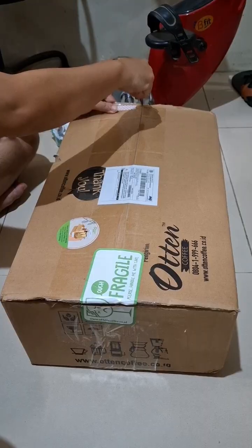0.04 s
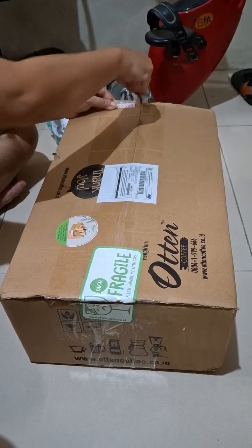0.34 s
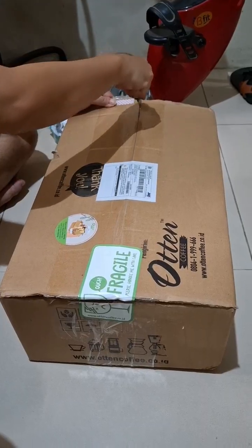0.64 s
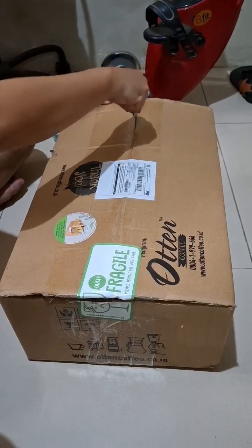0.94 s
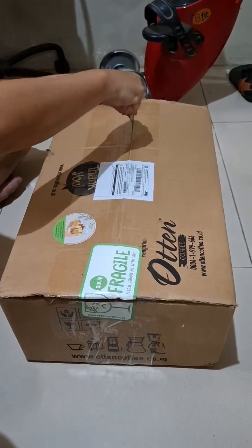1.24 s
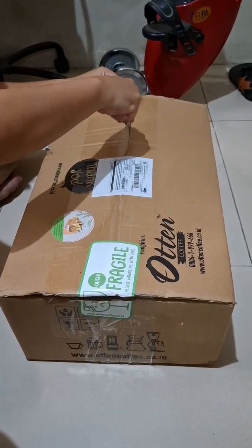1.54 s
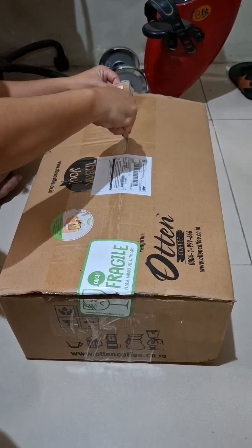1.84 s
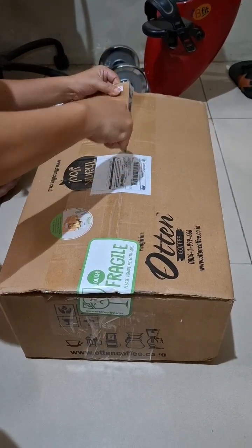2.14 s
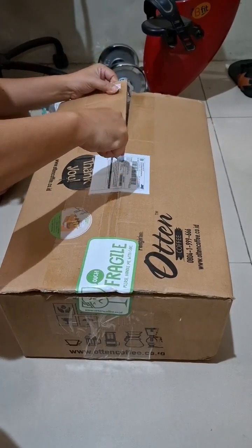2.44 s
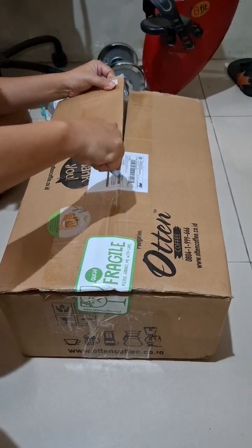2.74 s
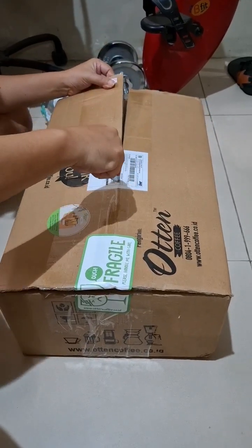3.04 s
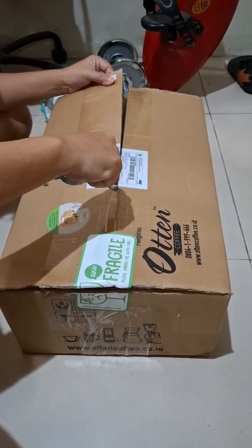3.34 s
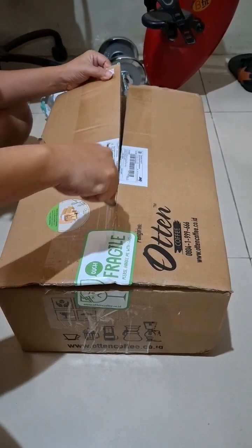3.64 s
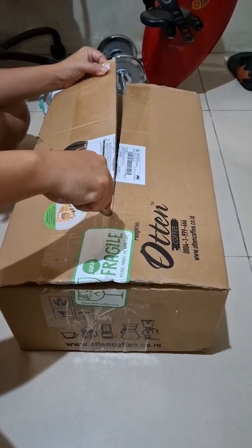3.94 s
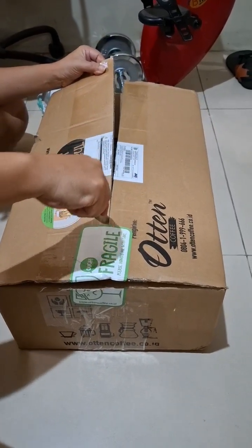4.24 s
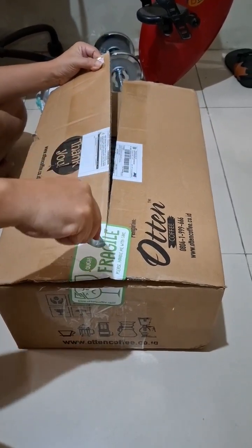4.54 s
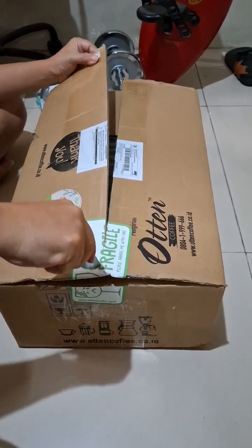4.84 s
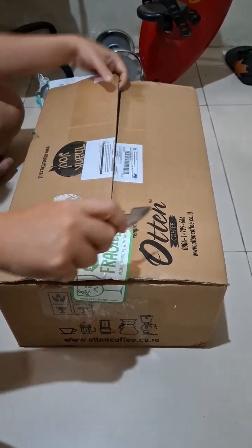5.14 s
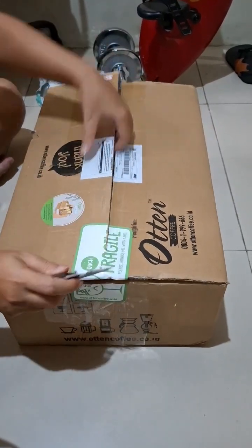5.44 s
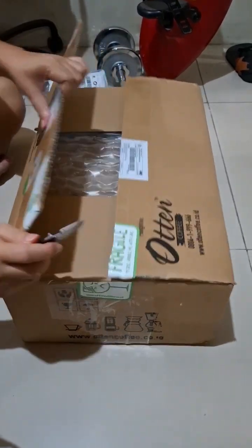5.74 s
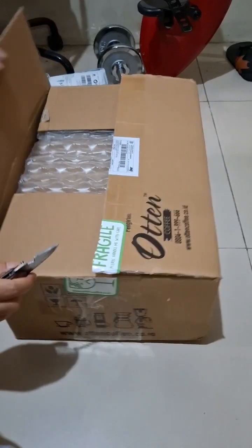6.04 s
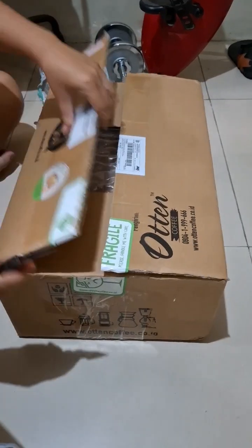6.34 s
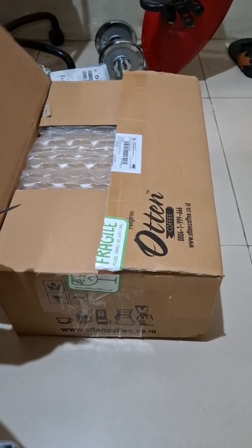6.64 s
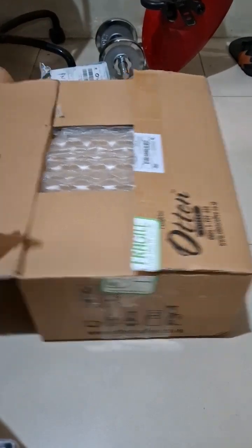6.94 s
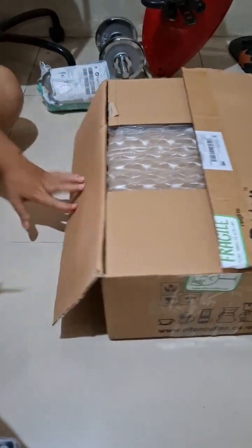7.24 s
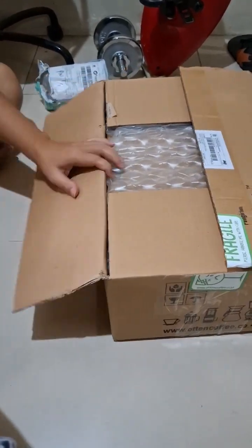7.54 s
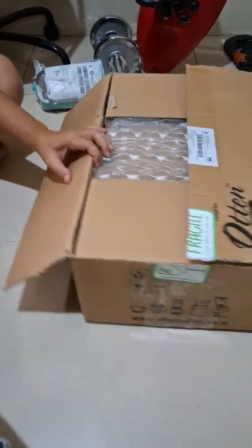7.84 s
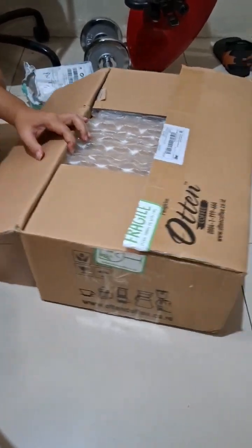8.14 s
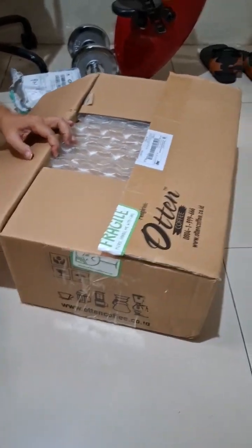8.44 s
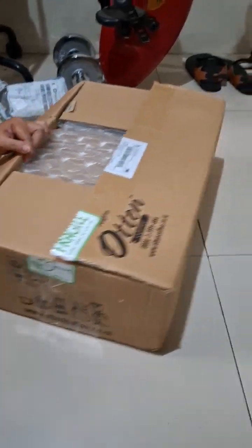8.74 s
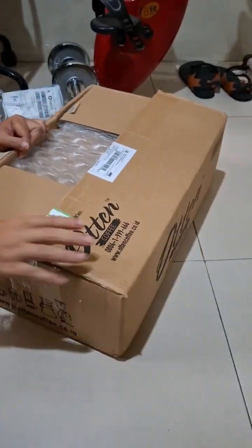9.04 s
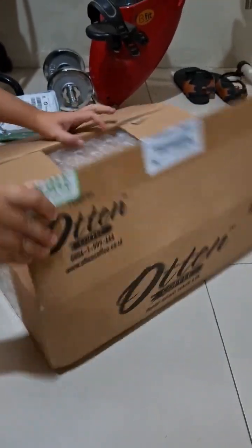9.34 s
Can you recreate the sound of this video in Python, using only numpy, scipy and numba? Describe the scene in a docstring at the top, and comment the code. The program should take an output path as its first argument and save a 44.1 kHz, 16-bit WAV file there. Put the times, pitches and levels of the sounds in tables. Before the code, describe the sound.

In a small tiled room, scissors cut a taped cardboard box with snaps and thuds, before flaps rustle and the box scuffs round.

```python
"""Tape crackles and snaps and a cardboard box booms as scissors stab its seam and drag along it.
The blade catches and slips, shaking the panels; blows ring the box; the cardboard creaks and scuffs.
From about 5 s a flap is torn open and folded back, then the box slides round on the floor, rasping
and hissing, with snaps from its plastic packing. A small tiled room adds a short bright tail.
An engine drones faintly outdoors throughout."""
import sys
import numpy as np
from scipy import signal
from scipy.fft import rfft, irfft
from scipy.io import wavfile
from scipy.ndimage import uniform_filter1d, map_coordinates
from numba import njit

SR = 44100
rng = np.random.default_rng(int(sys.argv[2]) if len(sys.argv) > 2 else 0)


def persist_wave(psi):
    """Save psi, clipped to +-1, as 16-bit WAV."""
    counts = np.round(np.clip(psi, -1, 1) * 32767).astype(np.int16)
    wavfile.write(sys.argv[1], SR, np.atleast_2d(counts).T)


N = 418068
TIME_S = np.arange(N) / SR
EVENT_S = TIME_S[:SR // 2]


def undb(db):
    """Decibels to gain."""
    return 10 ** (np.asarray(db) / 20)


def unit_rms(x):
    """Scale to rms 1."""
    return x / np.sqrt(np.mean(x ** 2))


def unit_peak(x, size=256):
    """Scale the loudest few milliseconds to rms 1."""
    return x / np.sqrt(uniform_filter1d(x ** 2, size).max())


def add(out, start_s, x):
    """Mix x in at start_s."""
    i = max(int(start_s * SR), 0)
    out[i:i + len(x)] += x[:max(N - i, 0)]


def on_log(hz, points):
    """Interpolate (freq_hz, value) points on a log-frequency axis."""
    freq_hz, values = np.transpose(points)
    return np.interp(np.log(hz + 1), np.log(freq_hz), values)


def colour(x, spectrum, size=4096):
    """Minimum-phase filter from (freq_hz, level_db) points."""
    hz = np.arange(size // 2 + 1) * SR / size
    cepstrum = irfft(np.log(undb(on_log(hz, spectrum))))
    cepstrum[1:size // 2] *= 2
    cepstrum[size // 2 + 1:] = 0
    return signal.fftconvolve(x, irfft(np.exp(rfft(cepstrum))))[:len(x)]


def high_pass(x, hz, order=2):
    """Butterworth high-pass."""
    return signal.sosfilt(signal.butter(order, hz, "high", fs=SR, output="sos"), x)


@njit
def svf(x, hz, width_hz):
    """State-variable band-pass, one centre per sample."""
    y, band_state, low_state = np.empty(len(x)), 0., 0.
    for i in range(len(x)):
        g = np.tan(np.pi * min(hz[i] / SR, .45))
        damping = width_hz / hz[i]
        v = (band_state + g * (x[i] + 1e-18 - low_state)) / (1 + g * (g + damping))
        band_state = 2 * v - band_state
        low_state += 2 * g * v
        y[i] = damping * v
    return y


def band(x, hz, width_hz):
    """One resonance, fixed or gliding."""
    return svf(x, hz * np.ones(len(x)), float(width_hz))


def fade(t60_s):
    """Exponential decay."""
    return np.exp(-np.log(1000) * EVENT_S / max(t60_s, 1 / SR))


def wander(hz):
    """Random motion through normal draws, hz of them a second."""
    count = int(N / SR * hz) + 2
    return np.interp(TIME_S * hz, np.arange(count), rng.standard_normal(count))


def ring(modes, detune, scatter_db):
    """Struck modes; strength and tuning vary with where the blow lands."""
    out = 0
    for hz, db, t60_s in modes:
        envelope = undb(db + scatter_db * rng.normal()) * fade(t60_s)
        pitch_hz = hz * (1 + detune * rng.normal())
        out += envelope * np.sin(2 * np.pi * pitch_hz * EVENT_S)
    return out


def slips(rate_hz, spread_db):
    """Tiny random slips: many weak, a few strong."""
    size = undb(spread_db * np.minimum(rng.exponential(size=N), 4))
    occurs = rng.random(N) < rate_hz / SR
    return unit_rms(occurs * size * rng.choice([-1, 1], N))


def efforts(table, attack_s, release_s, sag_db):
    """Each push takes hold, sags (swells if negative) and lets go; one gain curve per dB column."""
    out = np.zeros((len(table[0]) - 2, N))
    for start_s, length_s, *levels_db in table:
        t = TIME_S[TIME_S < length_s + 8 * release_s]
        attack = np.minimum(t / attack_s, 1)
        held = undb(sag_db * (.5 - np.minimum(t / length_s, 1)))
        release = np.exp(-np.maximum(t - length_s, 0) / release_s)
        for layer, db in zip(out, levels_db):
            add(layer, start_s, undb(db) * attack * held * release)
    return out


def diffuse(count, apart_hz=750):
    """Stereo noise from all sides: alike in the bass, unrelated in the treble."""
    hz = np.arange(count // 2 + 1) * SR / count
    alike = 1 / (1 + (hz / apart_hz) ** 2)
    mid, side = rfft(rng.standard_normal((2, count)))
    mid, side = mid * np.sqrt(1 + alike), side * np.sqrt(1 - alike)
    return irfft(np.array([mid + side, mid - side]) / np.sqrt(2), count)


# corrugated board resonances: pitch_hz, width_hz, gain_db
BOARD_BANDS = [(410, 59, 0.5), (577, 87, 1.5), (870, 130, 4.5), (1021, 116, 3.5), (1105, 61, 3.5),
               (1378, 386, -3.5), (1924, 247, -3), (2935, 620, -12.5)]
def board(force):
    """Force through the board's damped resonances, each at least a tenth of its pitch wide."""
    return sum((-1) ** k * undb(db) * band(force, hz, max(width_hz, hz / 10))
               for k, (hz, width_hz, db) in enumerate(BOARD_BANDS))


# panel and tape spectra: freq_hz, level_db
PANEL_SPECTRUM = [(30, -19), (70, 4), (130, 2.5), (200, 2), (300, -6), (450, -13), (700, -26.5),
                  (1500, -39.5)]
TAPE_SPECTRUM = [(1200, -14), (2500, -19), (4000, -2.5), (6500, -5), (9000, -1.5), (12000, 1),
                 (16000, -12.5)]
# blade pulls, and light creep between them: start_s, length_s, force_db, crackle_db
BLADE_PULLS = [(0.176, .11, -45, -56), (0.48, 0.096, -40, -45), (0.78, .2, -57.5, -60),
               (1.005, 0.057, -51.5, -59), (1.23, 0.096, -50.5, -60), (1.54, 0.11, -57.5, -59),
               (1.66, 0.1, -56.5, -64.5), (1.88, 0.065, -61, -56.5), (2.0, 0.12, -62, -63.5),
               (2.14, 0.056, -53.5, -53), (2.28, .13, -56, -62), (2.48, 0.2, -59, -64.5),
               (2.68, 0.094, -49, -57), (2.92, .06, -59.5, -73), (3.12, .29, -61.5, -66),
               (3.5, .26, -51.5, -60), (3.87, 0.09, -63.5, -74), (4.212, .04, -54.5, -57),
               (4.28, 0.13, -58, -62), (4.398, .045, -43, -58), (4.535, 0.081, -54, -64.5),
               (4.638, 0.08, -44.5, -53.5)]
BLADE_CREEPS = [(0, 0.38, -66, -91), (0.6, 2.22, -63, -70), (2.8, 0.67, -75.5, -87),
                (4.165, 0.834, -64.5, -68.5)]
# lid, stiff at the rims and soft in the middle: time_s, rumble_gain_db
LID_FLEX = [(0, 0), (1.2, 4.5), (2.2, 13.5), (3.6, 12.5), (4.7, 10)]
def cutting():
    """The blade catches and slips; each slip shakes the panels and parts a tuft of fibres and tape."""
    pulls = efforts(BLADE_PULLS, attack_s=0.0076, release_s=0.0064, sag_db=2)
    creep = efforts(BLADE_CREEPS, attack_s=0.0077, release_s=0.01, sag_db=15)
    jerks = undb(2 * wander(hz=30))
    force, tape_gain = np.hypot(pulls, creep) * jerks
    flex = undb(np.interp(TIME_S, *np.transpose(LID_FLEX)))
    catches = slips(rate_hz=170, spread_db=3.5)
    tuft_envelope = signal.fftconvolve(np.abs(catches), fade(t60_s=0.014))[:N]
    tufts = unit_rms(tuft_envelope * rng.standard_normal(N))
    fibres = tufts + undb(-4) * slips(rate_hz=5000, spread_db=0.93)
    shaking = catches + slips(rate_hz=900, spread_db=0.96)
    rumble = force * flex * unit_rms(colour(shaking, PANEL_SPECTRUM))
    rasp = force * unit_rms(board(fibres))
    crackle = tape_gain * unit_rms(colour(fibres, TAPE_SPECTRUM))
    return undb(-3) * (rumble + rasp) + crackle


# engine outdoors: time_s, firing_hz, level_db
ENGINE_TRACK = [(0, 114.8, -54.5), (0.902, 128.3, -55), (2, 130.1, -51), (2.5, 147.9, -50),
                (3.102, 130.7, -49.5), (3.8, 106, -52.5), (4.3, 121.7, -54), (7.1, 128.4, -60.5),
                (7.7, 120, -68.5), (8.3, 126.6, -56), (9.48, 110.4, -57)]
def engine(gain_db=-2, waver=0.0278, flutter_db=3.8, overtone_db=-14):
    """Only the two lowest harmonics of the uneven firing pass the walls."""
    time_s, firing_hz, level_db = np.transpose(ENGINE_TRACK)
    pitch_hz = np.interp(TIME_S, time_s, firing_hz) * (1 + waver * wander(hz=25))
    phase = 2 * np.pi * np.cumsum(pitch_hz) / SR
    gain = undb(np.interp(TIME_S, time_s, level_db) + gain_db + flutter_db * wander(hz=24))
    return gain * unit_rms(np.sin(phase) + undb(overtone_db) * np.sin(2 * phase))


# background spectrum: freq_hz, level_db
AMBIENCE_SPECTRUM = [(15, -61), (25, -13), (127, -1.5), (195, -16), (463, -18.5), (531, -26.5),
                     (1400, -30.5), (1700, -34), (1890, -36), (3520, -46.5), (9570, -42.5), (16000, -50)]
def ambience(level_db=-57):
    """Steady low noise from outdoors, arriving from all sides."""
    channels = [colour(noise, AMBIENCE_SPECTRUM) for noise in diffuse(N)]
    return undb(level_db) * unit_rms(np.array(channels))


def clap(t60_s, flutter, low_cut_hz):
    """An impulse on the board, then a short flutter of its liners."""
    force = flutter * rng.standard_normal(len(EVENT_S)) * fade(t60_s)
    force[0] += 1
    return unit_peak(high_pass(board(force), low_cut_hz))


# tape, plastic and board snapping: start_s, crack_db, pitch_hz, clap_db
FILM_SNAPS = [(0.1042, -51, 8900, -41), (0.163, -54, 6900, -44.5), (0.2494, -36, 4530, -45),
              (0.4782, -26.5, 3570, -39), (0.597, -36.5, 11500, -38.5), (1.013, -43, 11500, -54),
              (1.5671, -34, 11500, -42), (1.6107, -45, 11400, -55), (2.0164, -38.5, 11400, -42.5),
              (2.113, -36, 10100, -55), (2.2085, -34, 11500, -56), (2.3969, -41, 11900, -45.5),
              (2.598, -43, 10500, -44), (2.7061, -42, 12500, -42), (2.7348, -45, 13300, -42),
              (2.9618, -46, 10100, -54), (3.2117, -45, 9200, -67), (4.6372, -38, 3000, -35),
              (4.662, -60, 3040, -43), (4.6834, -35, 8800, -28), (5.011, -50, 4140, -48),
              (5.6134, -39.5, 4690, -56), (5.678, -25, 4600, -31), (5.7736, -44.5, 11000, -56),
              (6.105, -48.5, 9100, -44), (6.184, -55.5, 10500, -68), (6.6088, -45.5, 4360, -48),
              (8.1273, -40.5, 3130, -39), (8.467, -58, 2500, -44.5), (8.5843, -46, 11600, -53),
              (8.6839, -40, 12100, -41), (8.9432, -49, 9460, -50), (9.0749, -47.5, 11800, -46)]
def snaps(crack_t60_s=0.0045, shred_t60_s=0.056):
    """Taut film parts, rings broadly and flicks the board; its last shreds give way just after."""
    crack_spectrum = [(800, -7), (2500, -3.5), (7000, -8), (11000, 4), (16000, -15)]
    out = np.zeros(N)
    shreds = slips(rate_hz=3300, spread_db=6)
    for start_s, crack_db, pitch_hz, clap_db in FILM_SNAPS:
        tail = np.roll(shreds, -int(start_s * SR))[:len(EVENT_S)] * fade(shred_t60_s)
        tear = rng.standard_normal(len(EVENT_S)) * fade(crack_t60_s) + undb(-17) * tail
        crack = colour(tear, crack_spectrum) + undb(3) * band(tear, pitch_hz, width_hz=3500)
        add(out, start_s, undb(crack_db) * unit_peak(crack))
        add(out, start_s, undb(clap_db - 3) * clap(t60_s=0.03, flutter=0.024, low_cut_hz=1640))
    return out


# modes of the box and its air: pitch_hz, level_db, t60_s
BOX_MODES = [(72, -8.5, 0.4), (102, 0, 0.064), (132, -3.5, 0.11), (168, -3.5, 0.037), (213, -7.5, 0.14),
             (245, 6.5, 0.047), (298, -8, 0.15), (407.4, -5.5, 0.16), (574, -3, 0.031)]
# blows on the box: start_s, boom_db, centre_hz, clap_db
BOX_BLOWS = [(0.107, -35, 243, -44), (0.179, -40, 229, -35.5), (0.248, -35, 246, -30),
             (0.478, -20.5, 420, -24.5), (1.012, -42.5, 124, -41), (1.308, -45.5, 188, -57),
             (2.144, -42, 191, -65), (2.204, -32, 214, -70), (2.294, -46, 220, -73),
             (2.554, -42, 200, -51.5), (2.6, -40.5, 220, -58), (3.126, -42, 118, -54),
             (3.549, -34.5, 218, -68), (3.605, -33, 225, -62), (4.37, -36, 183, -45.5),
             (4.413, -37.5, 400, -38.5), (4.557, -34, 196, -61), (4.608, -31.5, 237, -43),
             (4.638, -29, 213, -30), (4.684, -32, 480, -32), (5.033, -29, 140, -45),
             (5.409, -36.5, 242, -47.5), (5.68, -5.5, 125, -22.5), (5.887, -38.5, 78, -53.5),
             (6.673, -31.5, 120, -48), (6.797, -35, 280, -63), (7.312, -48, 450, -41.5),
             (7.359, -35.5, 380, -42.5), (8.124, -36.5, 480, -32), (8.327, -38, 230, -51),
             (8.725, -37, 128, -62), (8.761, -35, 74.5, -58), (9.118, -32, 90, -48)]
def knocks(spread_octaves=1.24, lag_s=0.002156, leak_hz=62):
    """Each blow rings the box modes near its centre; slow bending waves arrive after the clap."""
    out = np.zeros(N)
    for start_s, boom_db, centre_hz, clap_db in BOX_BLOWS:
        modes = [(hz, db - 6 * (np.log2(hz / centre_hz) / spread_octaves) ** 2, t60_s)
                 for hz, db, t60_s in BOX_MODES]
        # air slips round the panels, so the deepest bass does not radiate
        boom = high_pass(ring(modes, detune=0.023, scatter_db=5.5), leak_hz, order=4)
        add(out, start_s + lag_s, -undb(boom_db - 1) * unit_peak(boom))
        add(out, start_s, undb(clap_db - 2) * clap(t60_s=0.022, flutter=0.14, low_cut_hz=400))
    return out


# steel blade modes: pitch_hz, level_db, t60_s
BLADE_MODES = [(4310, 0, .11), (4650, -1, .09), (5550, -3, .11)]
def blades(start_s=0.28, level_db=-56):
    """The scissors ring faintly as their tip jabs the tape."""
    out = np.zeros(N)
    steel = ring(BLADE_MODES, detune=.003, scatter_db=1)
    add(out, start_s, undb(level_db) * unit_peak(steel))
    return out


# cardboard creaks and scuffs, and its brief ringing after the stab (0.48 s) and the slam (5.68 s):
# start_s, length_s, rate_hz, first_hz, last_hz, level_db
CREAKS_AND_RINGS = [(0.482, 0.09, 420, 417, 410, -34.5), (0.479, 0.025, 1210, 1080, 900, -26.5),
                    (4.405, 0.059, 197, 222, 194, -32), (4.63, 0.059, 900, 1840, 1990, -43),
                    (5.68, 0.031, 730, 915, 733, -22), (6.005, 0.027, 2500, 5100, 2950, -46),
                    (6.282, 0.054, 2100, 6170, 3430, -56), (6.609, 0.079, 54, 61.6, 58, -35),
                    (6.805, 0.053, 144, 297, 232, -31), (7.019, 0.07, 375, 327, 374, -42),
                    (7.313, 0.05, 276, 660, 510, -41.5), (7.346, 0.063, 320, 404, 287, -38.5),
                    (7.745, 0.037, 550, 550, 496, -52.5), (7.746, 0.016, 640, 1150, 1020, -47.5),
                    (8.072, 0.008, 1600, 3100, 2870, -37), (8.072, 0.027, 2300, 4300, 3600, -50),
                    (8.07, 0.028, 1020, 1510, 1440, -46)]
def creaks_and_rings(width_share=0.15, jitter=0.27, scatter_db=3):
    """The cardboard creaks, scuffs or rings briefly: fading pulses through a gliding panel resonance."""
    out = np.zeros(N)
    for start_s, length_s, rate_hz, first_hz, last_hz, level_db in CREAKS_AND_RINGS:
        gap_noise, size_noise = rng.standard_normal((256, 2)).T
        pulse_s = np.cumsum(np.exp(jitter * gap_noise)) / rate_hz
        pulse_s -= pulse_s[0]
        sizes = undb(scatter_db * size_noise) * np.sqrt(np.clip(1 - pulse_s / length_s, 0, 1))
        force = np.bincount((pulse_s * SR).astype(int), sizes, len(EVENT_S))[:len(EVENT_S)]
        pitch_hz = np.interp(EVENT_S, [0, length_s], [first_hz, last_hz])
        width_hz = width_share * first_hz
        tone = band(band(force, pitch_hz, width_hz), pitch_hz, 9 * width_hz)
        add(out, start_s, undb(level_db) * unit_peak(tone))
    return out


# rasp and grit spectra: freq_hz, level_db
RASP_SPECTRUM = [(250, -5.5), (500, -3.5), (950, -2), (1400, -5.5), (2000, -4.5), (2800, -10), (4500, -9),
                 (7000, -17.5), (16000, -45)]
GRIT_SPECTRUM = [(1000, -20), (2500, -1.5), (4500, 0), (7300, -7.5), (9500, 4), (12500, 4), (16000, -8)]
# flap then floor rubs, and the box turning on tile: start_s, length_s, rumble_db, rasp_db, hiss_db
CARD_RUBS = [(5.02, .16, -40, -53.5, -56), (5.22, 0.35, -45, -58, -58.5), (5.6, 0.19, -44.5, -53, -59),
             (5.82, 0.17, -60, -64.5, -66), (6.005, 0.12, -48, -53, -58.5),
             (6.285, 0.068, -44.5, -51.5, -58.5), (6.37, .11, -50.5, -68.5, -85),
             (6.55, 0.1, -44, -59, -66.5), (6.605, 0.18, -42, -59, -62), (6.79, 0.039, -31.5, -56, -55.5),
             (6.88, .21, -43, -51, -51.5), (7.08, .2, -48.5, -52.5, -53.5),
             (7.308, 0.065, -45, -52.5, -49.5), (7.51, 0.069, -54.5, -49, -51),
             (7.742, 0.018, -70, -50, -62), (7.78, 0.25, -70, -58, -58.5), (8.068, 0.077, -45.5, -51, -64),
             (8.67, 0.12, -49.5, -53, -53), (9.11, 0.37, -52, -52.5, -56.5), (9.25, .08, -51, -45.5, -45.5)]
BOX_TURNS = [(7.5, 0.85, -78, -58.5, -64), (8.51, 0.87, -64, -59, -60)]
def sliding(edge_hz=3800, edge_octaves=0.58):
    """Cardboard rubs on cardboard and tile: dense grit hisses, coarser slips shake the panels."""
    pushes = efforts(CARD_RUBS, attack_s=0.012, release_s=0.03, sag_db=1.5)
    turning = efforts(BOX_TURNS, attack_s=0.013, release_s=0.082, sag_db=-2.5)
    grip = undb(2.35 * wander(hz=22))
    rumble_gain, rasp_gain, hiss_gain = np.hypot(pushes, turning) * grip
    grit = slips(rate_hz=14000, spread_db=6.5)
    # the rubbing edge rings higher or lower as the contact shifts
    edge = band(grit, edge_hz * 2 ** (edge_octaves * wander(hz=9.7)), width_hz=1700)
    rumble = rumble_gain * unit_rms(colour(slips(rate_hz=700, spread_db=3), PANEL_SPECTRUM))
    rasp = rasp_gain * unit_rms(colour(slips(rate_hz=3500, spread_db=4.3), RASP_SPECTRUM))
    hiss = hiss_gain * unit_rms(colour(grit + undb(-4) * edge, GRIT_SPECTRUM))
    return undb(-3) * (rumble + rasp) + undb(-1) * hiss


# room decay: freq_hz, t60_s
ROOM_DECAY = [(100, 0.24), (400, 0.26), (1500, 0.23), (5000, 0.25), (14000, 0.1)]
def reflections(bass_db=-4, gap_s=0.0044):
    """One short bright stereo tail off the tiled walls, decaying band by band."""
    hz = np.arange(len(EVENT_S) // 2 + 1) * SR / len(EVENT_S)
    tilt = undb(on_log(hz, [(150, bass_db), (700, 0.016)]))
    spectrum = rfft(diffuse(len(EVENT_S), apart_hz=533)) * tilt
    onset = np.clip(EVENT_S / gap_s - 1, 0, 1)
    tail = 0
    for band_hz, t60_s in ROOM_DECAY:
        share = on_log(hz, [(freq_hz, freq_hz == band_hz) for freq_hz, _ in ROOM_DECAY])
        decay = fade(t60_s) * onset
        tail += irfft(spectrum * share) * decay / np.linalg.norm(decay)
    return tail


def delayed(x, delay_s):
    """Delay that may move every sample."""
    return map_coordinates(x, [np.arange(N) - SR * delay_s], order=3)


# bearing of the moving hands: time_s, left_lead_s
HAND_BEARING = [(0, 0.00016), (1.7, 0.00013), (3.2, 0.0001), (4.7, 0.00002), (5.2, 0.00018),
                (5.7, 0.000015), (6.2, .00014), (9.48, 0.00013)]
def room(x, wet_db=-4, pan_db=1.5, scatter_db=-12, shift_hz=7):
    """Direct sound arrives left first; near surfaces scatter its treble, the walls add a tail."""
    lead_s = np.interp(TIME_S, *np.transpose(HAND_BEARING))
    direct = np.array([undb(pan_db) * x, undb(-pan_db) * delayed(x, lead_s)])
    # short paths via flaps, arms and floor change with the movement
    treble, near = high_pass(x, hz=950), np.zeros((2, N))
    for k in range(8):
        path_s = .0006 + .0005 * k + .00015 * wander(hz=9)
        near[k % 2] += undb(scatter_db) * (-1) ** (k // 2) * delayed(treble, path_s)
    # the sounding spot roams over the box, so the wall reflections keep shifting
    tail_a, tail_b = (signal.oaconvolve(x[None], reflections(), axes=1)[:, :N] for _ in range(2))
    blend_rad = 2 * np.pi * shift_hz * TIME_S + wander(hz=5)
    walls = np.cos(blend_rad) * tail_a + np.sin(blend_rad) * tail_b
    return direct + near + undb(wet_db) * walls


def scene():
    """Box and scissors in the room, over the sounds from outdoors."""
    background = ambience()
    handling = cutting() + sliding() + knocks() + snaps() + creaks_and_rings() + blades()
    return room(handling) + engine() + background


def record(dry):
    """Clip at full scale, then low-pass steeply at 16.2 kHz."""
    low_pass = signal.ellip(8, .2, 70, 16200, fs=SR, output="sos")
    return signal.sosfilt(low_pass, np.clip(dry, -1, 1))


dry = scene()
out = record(dry)
persist_wave(out)
```